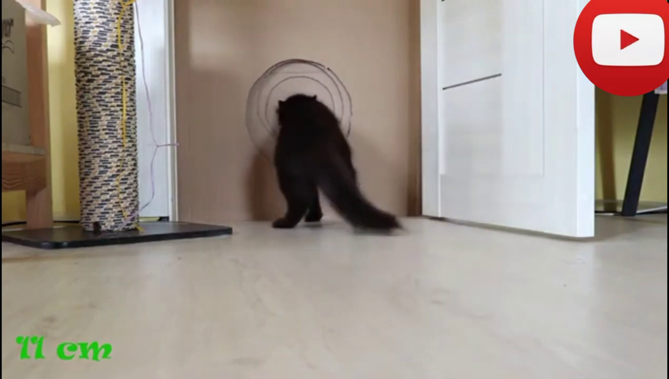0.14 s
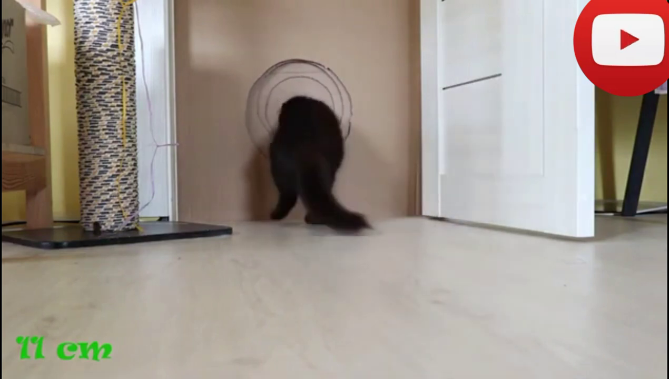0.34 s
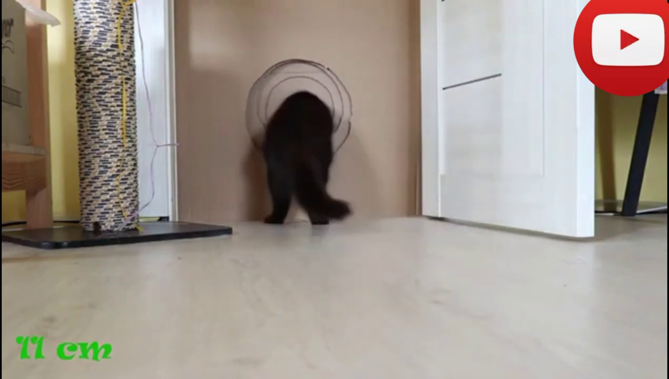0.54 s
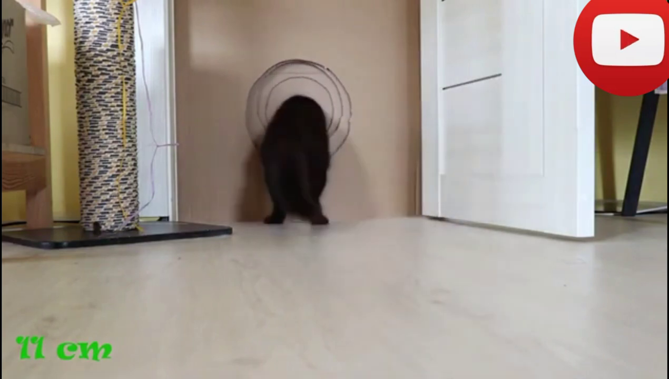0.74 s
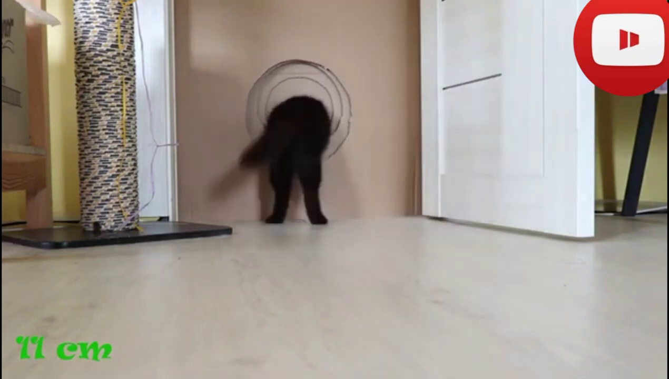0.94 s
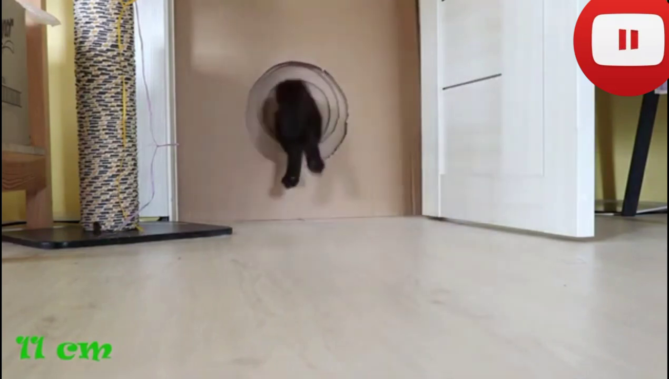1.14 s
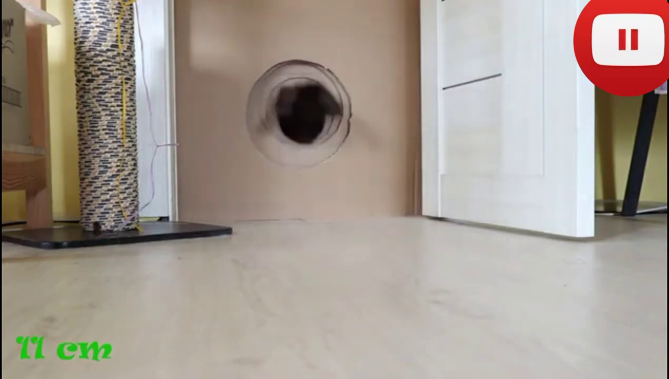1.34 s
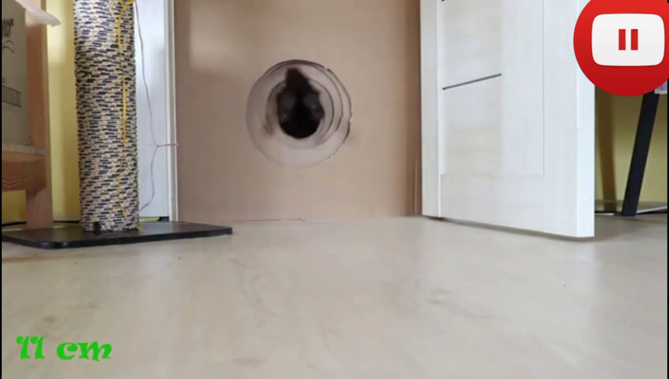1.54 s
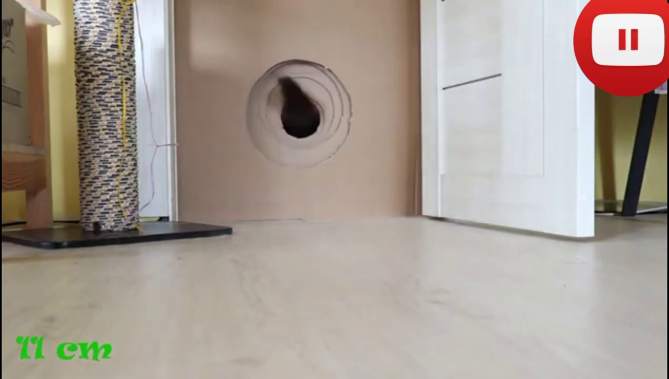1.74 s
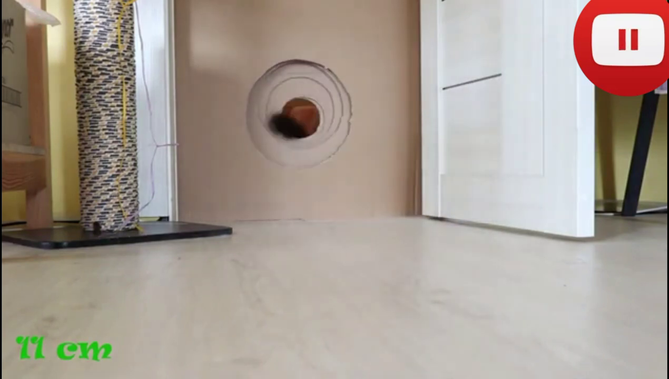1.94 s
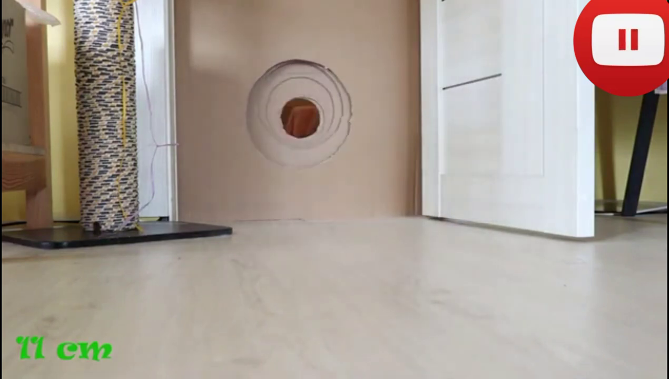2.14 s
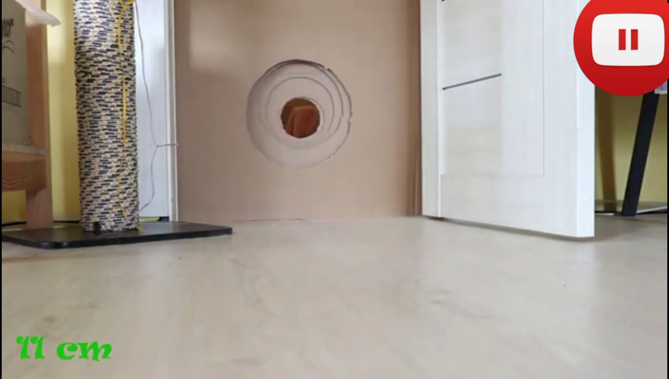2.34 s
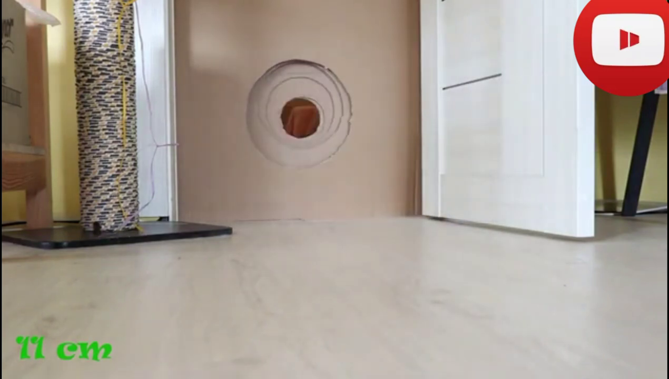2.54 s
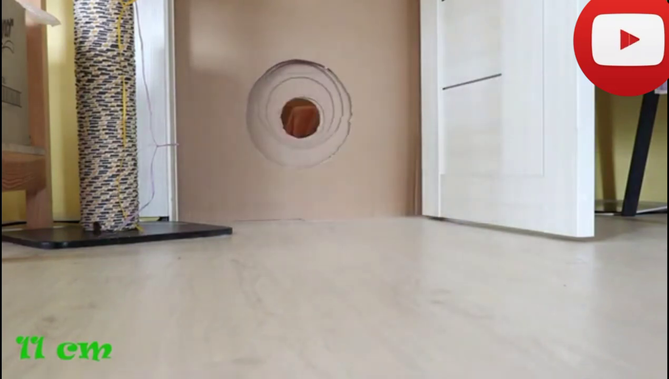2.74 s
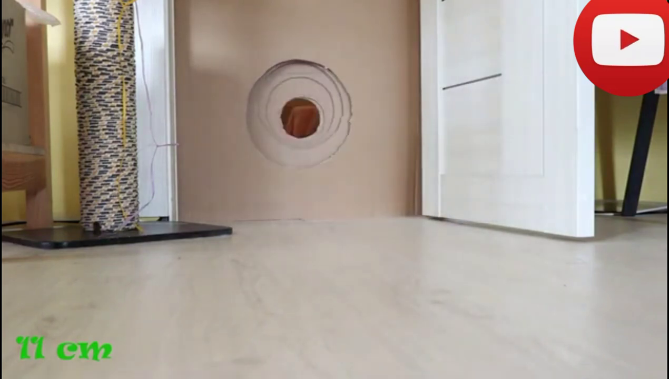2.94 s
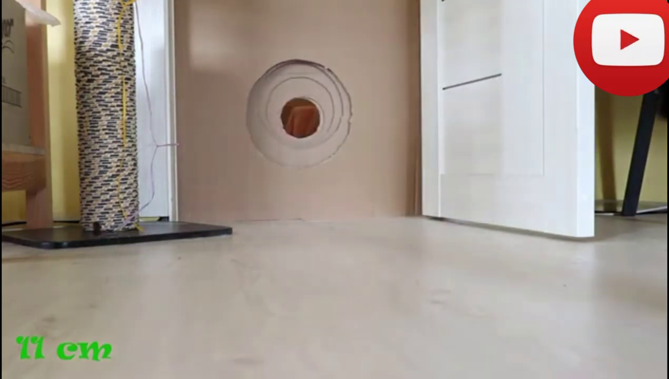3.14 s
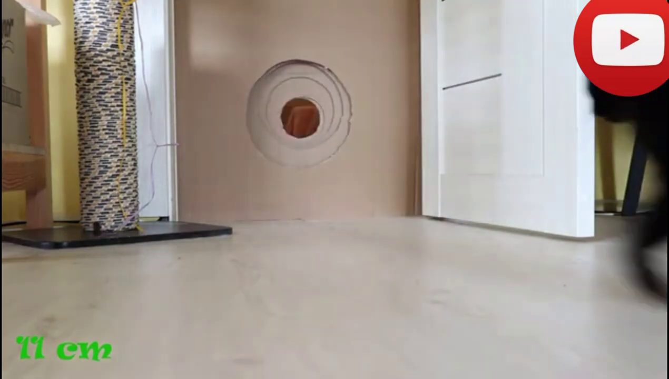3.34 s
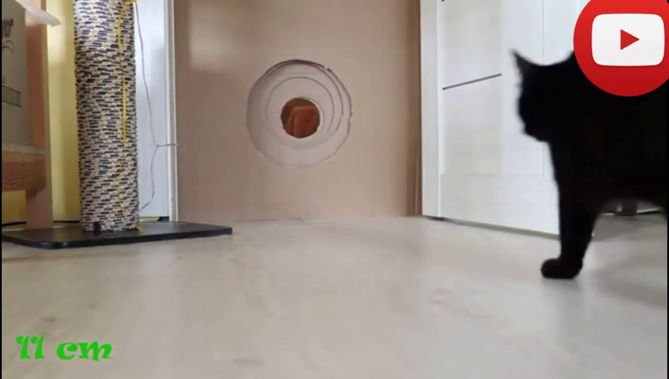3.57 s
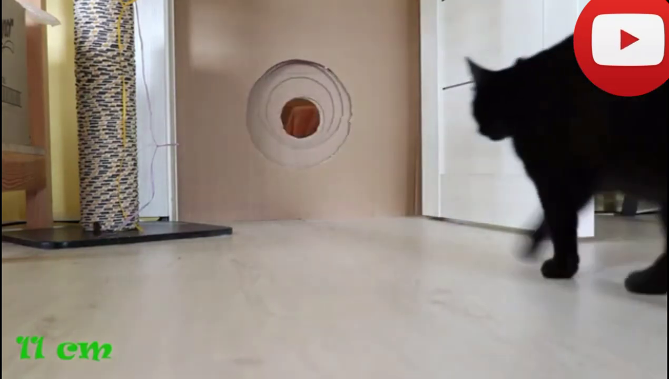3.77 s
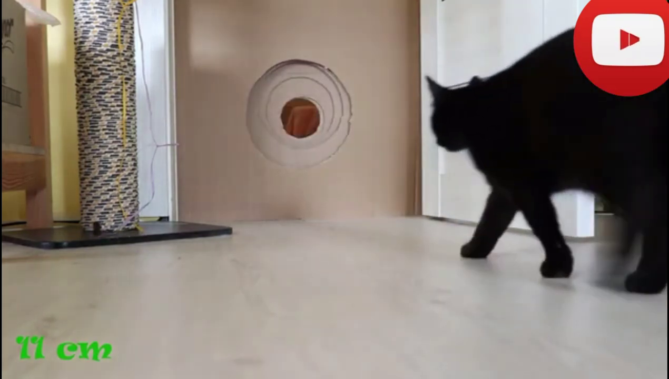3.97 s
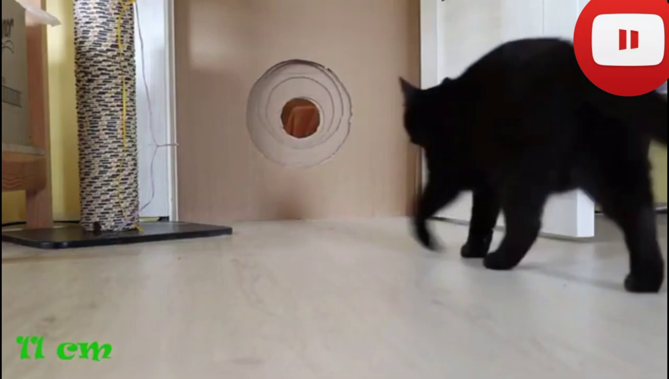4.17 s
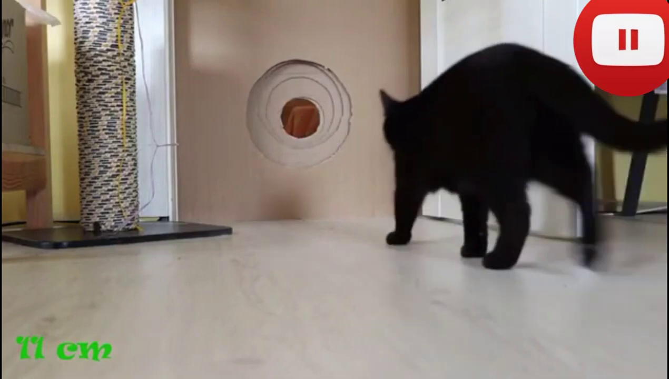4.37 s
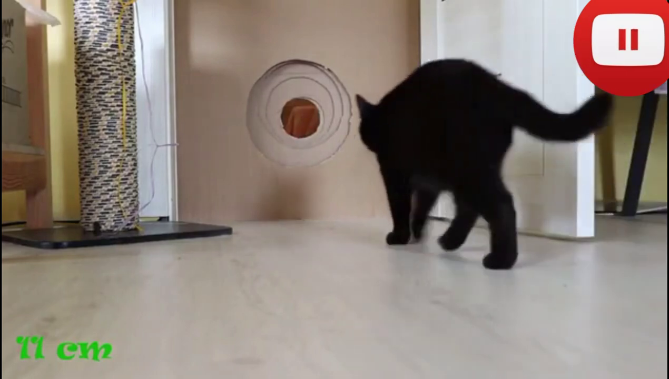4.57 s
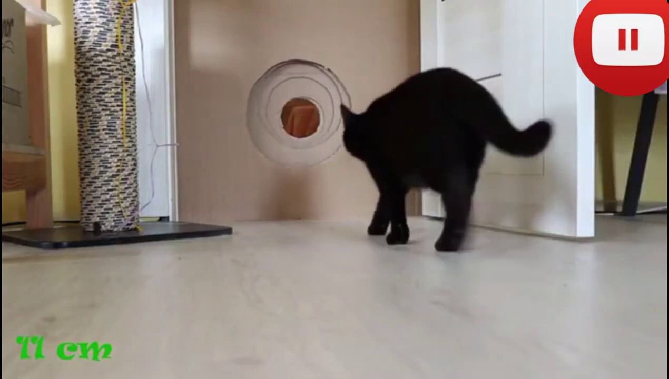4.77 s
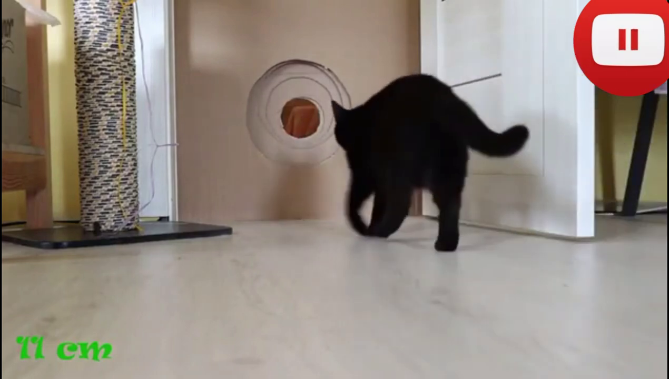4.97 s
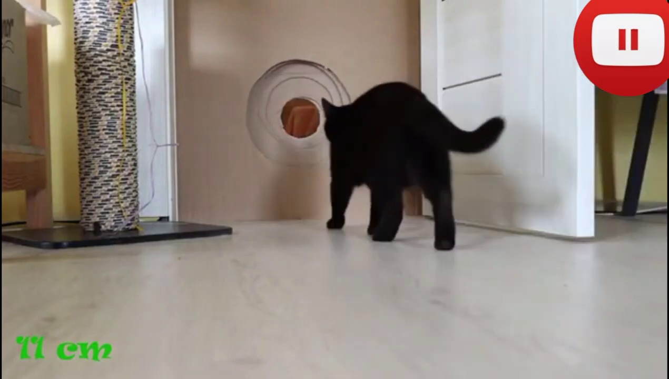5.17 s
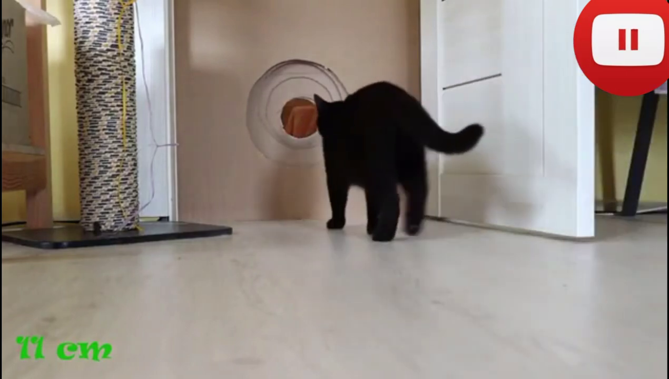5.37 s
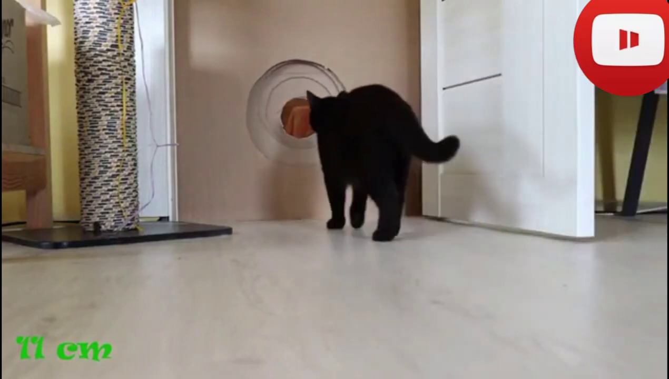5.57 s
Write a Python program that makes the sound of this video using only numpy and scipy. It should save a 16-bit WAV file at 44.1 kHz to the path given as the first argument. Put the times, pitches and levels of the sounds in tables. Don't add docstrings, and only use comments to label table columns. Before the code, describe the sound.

In a quiet small room, fur brushes lightly against a cut cardboard edge with faint ticks and an early knock. The cat then forces its body through the hole: a brief low squeak, hollow thuds and a harsh scuffle that overloads the close microphone. A few lighter knocks and tail brushes follow, then quiet room hum and soft paw steps.

```python
import sys
import numpy as np
from scipy import signal
from scipy.fft import rfft, irfft, next_fast_len
from scipy.io import wavfile

SR = 44100
rng = np.random.default_rng(int(sys.argv[2]) if len(sys.argv) > 2 else 0)


def output_pcm(signal):
    pcm = np.clip(np.atleast_2d(signal).T, -1, 1) * 32767
    wavfile.write(sys.argv[1], SR, np.round(pcm).astype(np.int16))


def rack_gain(trim_db):
    fader = np.asarray(trim_db, float)
    return 10 ** (fader / 20)


N = 247401


def level(x, db):
    return x * rack_gain(db) / np.sqrt(np.mean(x ** 2))


def curves(tables):
    s, *columns = np.vstack(tables).T
    return [np.interp(np.arange(N) / SR, s, c) for c in columns]


def colour(x, points):
    hz, db = np.transpose(points)
    size = next_fast_len(N)
    log_hz = np.log(np.fft.rfftfreq(size, 1 / SR) + 1)
    gain = rack_gain(np.interp(log_hz, np.log(hz), db))
    return irfft(rfft(x, size) * gain, size)[..., :N]


def band(x, lo_hz, hi_hz):
    edges_hz = [lo_hz, min(hi_hz, .45 * SR)]
    return signal.sosfilt(signal.butter(2, edges_hz, "bandpass", fs=SR, output="sos"), x)


def wide(mid, side, side_points):
    side = colour(side, side_points)
    return np.array([mid + side, mid - side])


def walk(rate_hz):
    return 1.19 * np.interp(np.arange(N) * rate_hz / SR, np.arange(1024), rng.standard_normal(1024))


def add(out, s, x):
    i = int(s * SR)
    out[i:i + len(x)] += x[:N - i]


def decay(t, t60):
    return np.exp(-np.log(1000) * t / max(t60, .004))


# freq_hz, density_db (per hertz)
ROOM = [(15, -13), (30, -5), (63, -1.5), (130, 0), (250, -3), (400, -4.5), (630, -13.5), (1000, -17),
        (2000, -23), (4000, -24.5), (8000, -25.5), (12500, -32), (15000, -35.5)]
# freq_hz, side_minus_mid_db
ROOM_SIDE = [(40, -9), (130, -9.5), (300, -6.5), (700, -4), (1500, -4.5), (15000, -3.5)]


def room_tone():
    mid, side = colour(rng.standard_normal((2, N)), ROOM) * rack_gain(.8 * walk(3))
    return level(wide(mid, side, ROOM_SIDE), -51)


def echo(x):
    room_t60_s, wet_db = .3, -4.5
    t = np.arange(SR // 2) / SR
    tail = rng.standard_normal((2, len(t))) * decay(t, room_t60_s) * (t > .004)
    tail = tail / np.sqrt(np.sum(tail ** 2, axis=1, keepdims=True))
    reflected = signal.fftconvolve(x[None], tail, axes=1)[:, :N]
    return rack_gain(wet_db) * band(reflected, 450, 12000)


CONTROL_STEP = 32
HOLD_SHARE = .15


def strokes(rows):
    s, db, rise, fall = np.transpose(rows)[:4, :, None]
    late = np.arange(0, N, CONTROL_STEP) / SR - s
    drop = np.maximum(-late / rise, np.maximum(late / fall - HOLD_SHARE, 0))
    return rack_gain(2 * (db - 10 * drop))


def fine(x):
    return np.interp(np.arange(N), np.arange(0, N, CONTROL_STEP), x)


# peak_s, level_db, rise_s (10 dB), fall_s (10 dB), weight_db
PAW_STROKES = [(3.31, -63, .1, .1, 11), (3.39, -52.5, .075, .09, -4), (3.7, -48.5, .07, .07, -14),
               (3.915, -53, 0.038, .12, -6.5), (4.04, -56.5, .1, .08, -5), (4.552, -47, .065, .08, -9),
               (4.645, -52, .03, .07, 7), (4.745, -54, .07, 0.14, -0.5), (5.04, -61, .04, .08, -6),
               (5.185, -59, .01, .06, 4), (5.315, -43.5, .02, .08, -6), (5.36, -53, .03, .14, 4),
               (5.56, -57, .1, .2, -3)]


def stirring(load_db, idle_db, paw_db):
    step_weight = rack_gain(2 * np.transpose(PAW_STROKES)[-1, :, None])
    steps = fine((strokes(PAW_STROKES) * step_weight).sum(axis=0))
    idle = rack_gain(2 * (idle_db + 1.5 * walk(4)))
    return np.sqrt(rack_gain(2 * load_db) + idle + steps * rack_gain(2 * paw_db))


# start_s, direction (+1 or -1), level_db, flex_hz, t60_s
SHOVES = [(0.354, -1, -9.5, 33, 0.16), (.426, 1, -12, 85, 0.14), (.454, 1, -6.5, 42, 0.095),
          (0.494, 1, -13.5, 43, 0.14), (1.328, -1, -5, 27.7, 0.26), (1.395, -1, -7.5, 29, 0.32),
          (1.49, 1, -6.5, 11, 0.3), (1.55, -1, 10.5, 24, .13), (1.586, -1, 5, 53, .12),
          (1.74, 1, 0.5, 18, .1), (1.7815, 1, 10, 29, 0.16), (1.798, -1, 21, 30, 0.052),
          (1.8235, -1, 5, 50, .06), (1.852, -1, -3.5, 25.5, 0.38), (1.906, 1, -2.5, 28, 0.14),
          (2.09, 1, -2, 37, 0.45), (2.229, 1, -2.5, 38, 0.12), (2.257, 1, -8, 40.3, 0.64),
          (2.515, 1, -31, 24, .35), (2.725, 1, -30, 13, 0.7), (4.58, 1, -36, 25, 0.18),
          (4.74, 1, -25.5, 9.5, .12)]
# time_s, load_db
LOAD = [(0, -61), (.136, -52), (.274, -35), (.48, -24), (.704, -40), (.978, -35), (1.2, -31), (1.378, -15),
        (1.512, -15), (1.558, -3.5), (1.706, -10), (1.768, -11), (1.91, -13), (2.16, -35), (2.3, -17.5),
        (2.55, -39), (2.95, -56)]


def flex():
    out, t = np.zeros(N), np.arange(SR) / SR
    for s, way, db, hz, t60 in SHOVES:
        onset = 1 - np.exp(-t / .004)
        swing = np.sin(2 * np.pi * hz * t) * decay(t, t60) * onset
        add(out, s, np.sign(way) * rack_gain(db) * swing)
    restless = level(band(band(rng.standard_normal(N), 7.5, 45), 8.1, 70), -2.8)
    return out + stirring(curves([LOAD])[0], idle_db=-56, paw_db=-3) * restless


# mode_hz, level_db, t60_s
SHEET = [(70, -8.5, 0.62), (116, -4, 0.48), (155.4, -1, 0.33), (246, -5, 0.24), (303, -5, 0.23),
         (424.8, -11.5, 0.32), (510.6, -16.5, 0.078), (695, -20, 0.16), (893, -30, 0.091)]


def drumming():
    push = rng.standard_normal(N) * rack_gain(2.5 * walk(35))
    hum = 0
    for hz, db, _ in SHEET[1:]:
        hum = hum + rack_gain(0.5 * db) * level(band(push, hz / 1.124, hz * 1.12), 0)
    let_go_s, drum_db, loose_db = 2.2, -4, -6
    drum_db = np.where(np.arange(N) < let_go_s * SR, drum_db, drum_db + loose_db)
    load_db = 1.25 * curves([LOAD])[0] + drum_db
    return stirring(load_db, idle_db=-56, paw_db=-6) * level(hum, -1.3)


# start_s, peak_db, hardness_db (per octave), ring_share (of full length)
KNOCKS = [(.36, -28, 11, 0.31), (0.408, -20, -3, 0.27), (0.423, -5, 0.5, 0.97), (0.992, -38, -6, 0.52),
          (1.104, -23, -1, 0.57), (1.295, -24, 3, 0.65), (1.352, -24, 2, 1.1), (1.523, -3.5, 8, 0.68),
          (1.574, 3.5, 7, .6), (1.826, -2.5, 2, 0.72), (1.912, -12, -1.5, .5), (2.1, -21.5, -2.5, 0.8),
          (2.191, -19.5, -1, 0.75), (2.247, -8, -4, 0.71), (2.33, -26, -2, .8), (3.084, -37, -4, 0.57),
          (4.631, -29.5, 9, 1.4), (5.183, -42, 0.5, 0.54), (5.305, -38.5, 4, 0.6), (5.37, -39, 4, 0.66)]


def knocks():
    out, t = np.zeros(N), np.arange(SR // 2) / SR
    hz, db, t60 = np.transpose(SHEET)[:, :, None]
    chance = rng.standard_normal((len(KNOCKS), 2, len(SHEET), 1))
    for (s, peak_db, hard_db, share), (weight, detune) in zip(KNOCKS, chance):
        gain = rack_gain(db + 3.0 * weight + hard_db * np.log2(hz / 250))
        tone = np.sin(2 * np.pi * hz * (1 + 0.056 * detune) * t)
        ring = gain * tone * np.exp(-np.log(1000) * t / (0.79 * max(share, .1) * t60))
        rattle = band(band(rng.standard_normal(len(t)), 130, 480 * rack_gain(hard_db)), 81, 1300)
        rattle = rattle * decay(t, .3 * share) * rack_gain(8.5)
        blow = (ring.sum(axis=0) + rattle) * (1 - np.exp(-t / .0005))
        add(out, s, rack_gain(peak_db) * blow / np.abs(blow).max())
    return out


# start_s, peak_db, centre_hz, t60_s
TICKS = [(.3252, -31, 3480, 0.0196), (0.4072, -32.5, 1901, .03), (0.682, -37.5, 7000, .015),
         (1.0847, -25, 2500, .02), (1.1997, -15, 11000, 0.012), (1.526, -4, 2030, .03),
         (1.6067, -4.5, 3018, .03), (1.8145, -11, 5000, .015), (1.9823, -12, 3986, .018),
         (5.1834, -37, 1800, .012), (5.2999, -37.5, 4010, 0.03)]


def ticks():
    out, t = np.zeros(N), np.arange(SR // 10) / SR
    for s, db, hz, t60 in TICKS:
        burst = rng.standard_normal(len(t)) * decay(t, t60)
        snap = band(burst, hz / 5.1, min(hz * 5.2, 12000))
        add(out, s, rack_gain(db) * snap / np.abs(snap).max())
    return out


# start_s, level_db, pitch_hz, length_s
CHIRPS = [
    (0.036, -38, 1464, 0.01),
    (.262, -50, 1450, .03),
    (.32, -50, 1470, .02),
    (2.47, -46, 1375, 0.014),
    (2.617, -54, 1244, 0.032),
    (2.62, -54, 1415, .03),
]


def chirps():
    out, t = np.zeros(N), np.arange(SR // 10) / SR
    for s, db, hz, length in CHIRPS:
        swell = np.sin(np.pi * np.clip(t / length, 0, 1))
        add(out, s, rack_gain(db) * np.sin(2 * np.pi * hz * t) * swell)
    return out


# time_s, pitch_hz, level_db
SQUEAK = [
    (1.345, 414, -23),
    (1.358, 422.6, -11),
    (1.371, 416.5, -11.5),
    (1.375, 408.7, 0.5),
    (1.4, 415, 1),
    (1.403, 431.2, -8),
    (1.415, 405, -6.5),
    (1.43, 413, -18),
    (1.52, 413, -27),
]


def squeak():
    hz, db = curves([SQUEAK])
    phase = 2 * np.pi * np.cumsum(hz * (1 + 0.007 * walk(150))) / SR
    t = np.arange(N) / SR
    gate = np.clip(np.minimum(t - SQUEAK[0][0], SQUEAK[-1][0] - t) / 0.019, 0, 1)
    tone = np.sin(phase) + rack_gain(-18.5) * np.cos(2 * phase) + rack_gain(-47.5) * np.sin(3 * phase)
    return rack_gain(db + .8 * walk(120)) * gate * tone


# peak_s, level_db, rise_s (10 dB), fall_s (10 dB), weight_db
HEAD_STROKES = [(.03, -56, .1, .05, -5), (.16, -52, .07, .1, -8), (.27, -46, .04, .07, -5),
                (.35, -46, .06, .06, -5), (.412, -41.5, .005, .035, 10), (.49, -59, .05, .09, 15),
                (.61, -56, .06, .08, -3), (.71, -51, .08, .06, -3), (.866, -44, .03, .1, -3),
                (.95, -45.5, .1, .06, -11), (1.092, -41, .03, .12, 0)]
# peak_s, level_db, rise_s (10 dB), fall_s (10 dB), weight_db
SHOULDER_STROKES = [
    (1.225, -39.5, .15, .15, -2),
    (1.29, -37, .08, .1, -2),
    (1.365, -27, .07, .06, 4),
    (1.4, -30, .03, .04, 15),
]
# peak_s, level_db, rise_s (10 dB), fall_s (10 dB), weight_db
HIP_STROKES = [(1.495, -27, .04, .05, 0), (1.528, -9, .006, .05, -2), (1.578, -12, .015, .04, 1),
               (1.612, -10, .008, .08, -2), (1.69, -18, .1, .06, 0), (1.74, -26, .02, .04, 4),
               (1.86, -27, .08, .06, 3), (1.93, -37, .05, .05, 1), (1.995, -36, .04, .1, 1),
               (2.08, -42, .06, .08, -3), (2.182, -40, .05, .06, -2), (2.245, -45, .05, .035, 2)]
# peak_s, level_db, rise_s (10 dB), fall_s (10 dB), weight_db
TAIL_STROKES = [
    (2.405, -49, 0.047, 0.056, -5),
    (2.48, -50, .05, 0.052, -6),
    (2.628, -49.5, .055, .03, -10),
]


def rubbing():
    kinds = [(HEAD_STROKES, -1.5), (SHOULDER_STROKES, 2.5), (HIP_STROKES, -2.5),
             (TAIL_STROKES, 1.5), (PAW_STROKES, -8)]
    power = np.vstack([strokes(rows) for rows, _ in kinds]) + 1e-12
    weight = np.hstack([np.transpose(rows)[-1] for rows, _ in kinds])
    bright = np.hstack([np.full(len(rows), db) for rows, db in kinds]) - .3 * weight
    total = power.sum(axis=0)
    rasp_db = 10 * np.log10(total)
    return fine(rasp_db), fine(weight @ power / total), fine(bright @ power / total)


# freq_hz, density_db (per hertz)
FUR = [(200, -17), (450, -11), (1000, -12.5), (1900, -12.5), (2800, -10), (4000, -12.5), (5500, -16.5),
       (7000, -15.5), (8500, -12.5), (10000, -17), (12500, -16.5), (14000, -22), (15200, -30.5)]
# freq_hz, side_minus_mid_db
FUR_SIDE = [(300, -32.5), (700, -12), (1400, -7), (3000, -13.5), (6000, -1), (15000, -1)]


def fur():
    rasp_db, dull_db, bright_db = rubbing()
    grain_db = 1.8 * rng.exponential(size=N) + 1.0 * walk(40) + 0.95 * walk(130)
    hairs = rng.standard_normal((2, N)) * rack_gain(grain_db)
    size = next_fast_len(N)
    rub = rfft(level(wide(*colour(hairs, FUR), FUR_SIDE), 3.65), size)
    octave = np.log2(np.fft.rfftfreq(size, 1 / SR) / 500 + 1e-9)
    rub = rub * rack_gain(1.9 * np.resize(walk(140), rub.shape[1]))
    out, spacing = 0, .8
    for centre in np.arange(-1, 8) * spacing:
        overlap = np.clip(1 - np.abs(octave - centre) / spacing, 0, 1)
        tuft = irfft(rub * overlap, size)[:, :N]
        dull = np.clip(2.2 - centre, 0, 1) * (dull_db + 6.0)
        bright = np.clip(centre - 3.2, 0, 1) * (bright_db + 2.5)
        out = out + tuft * rack_gain(dull + bright + 1.5 * walk(28))
    return rack_gain(rasp_db) * out


# freq_hz, side_minus_mid_db
BASS_SIDE = [(20, -17), (60, -16.5), (200, -17.5)]


def scene():
    hits = knocks() + squeak() + drumming() + ticks() + chirps()
    sheet = flex()
    sheet = wide(sheet, np.gradient(sheet) * 190, BASS_SIDE) * rack_gain(np.array([[-1.2], [.8]]))
    return room_tone() + sheet + hits + echo(hits) + fur()


def roll_off(x):
    return signal.sosfilt(signal.butter(12, 15460, fs=SR, output="sos"), x)


def record(dry):
    bend = 19.0
    mix = dry / (1 + np.abs(dry) ** bend) ** (1 / bend)
    return roll_off(mix)


dry = scene()
out = record(dry)
output_pcm(out)
```